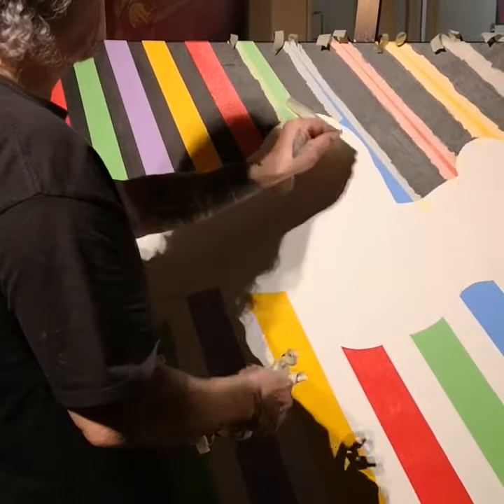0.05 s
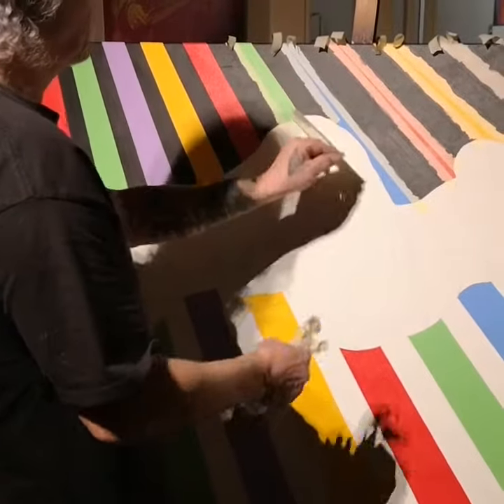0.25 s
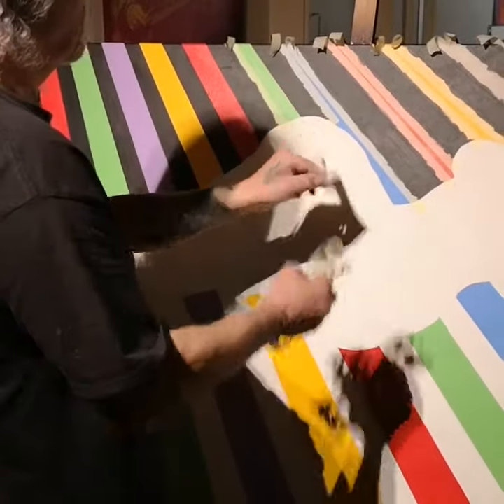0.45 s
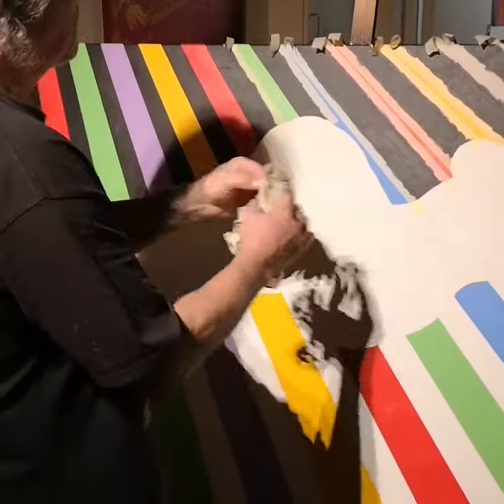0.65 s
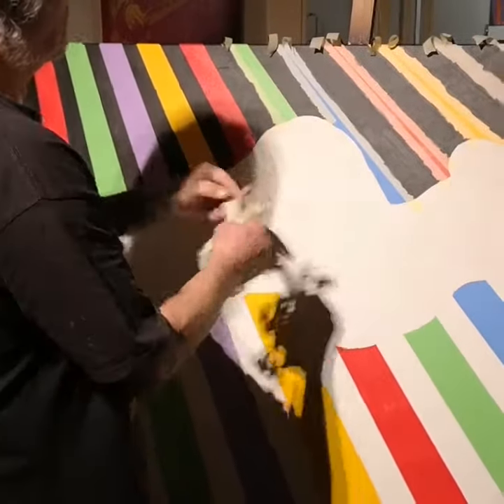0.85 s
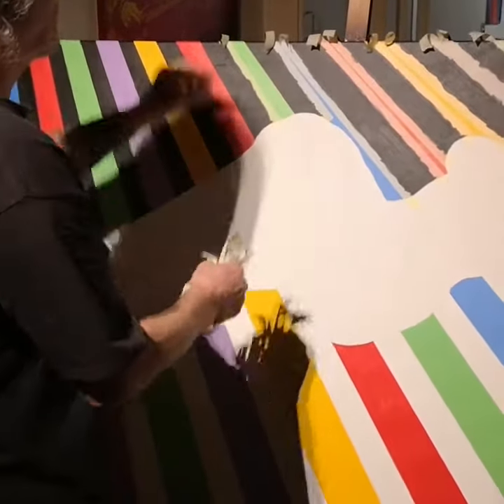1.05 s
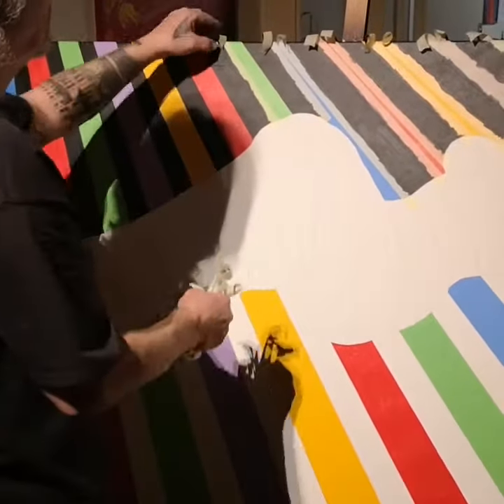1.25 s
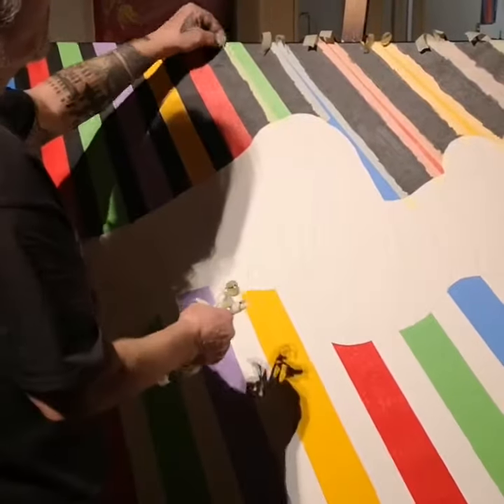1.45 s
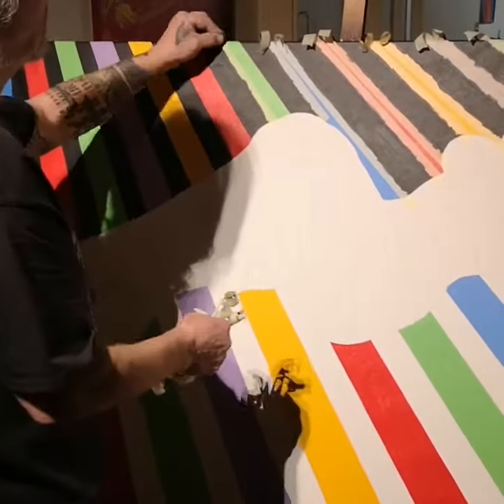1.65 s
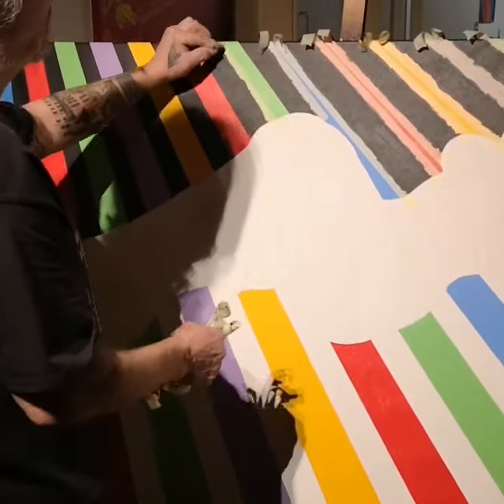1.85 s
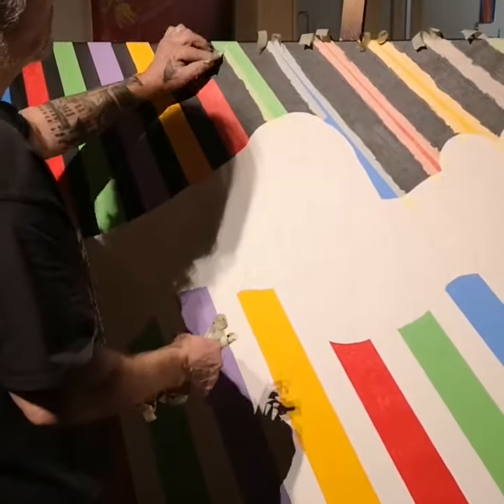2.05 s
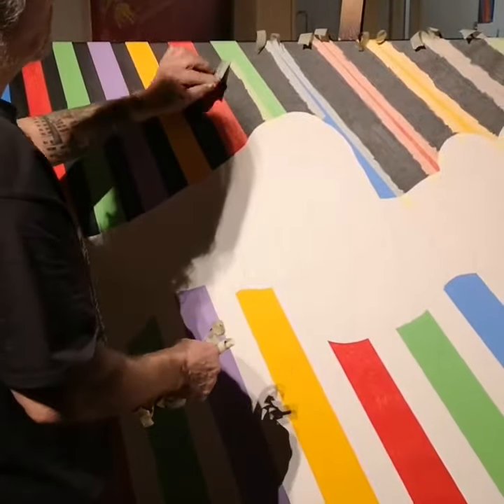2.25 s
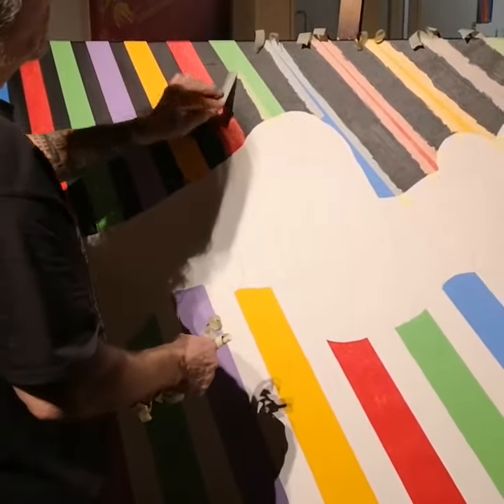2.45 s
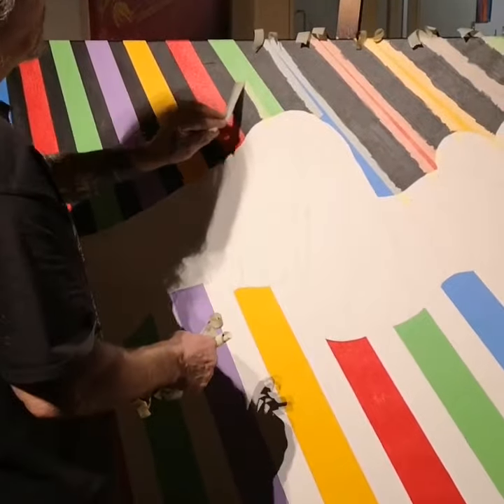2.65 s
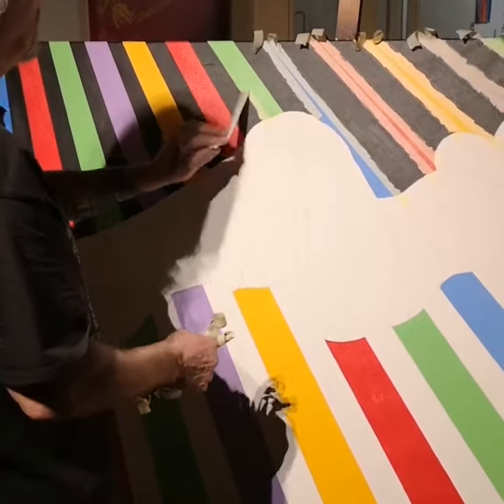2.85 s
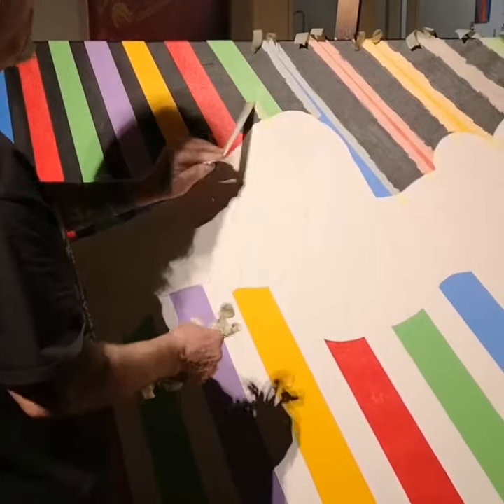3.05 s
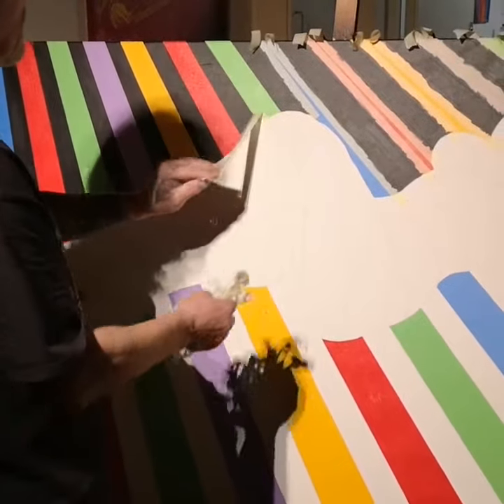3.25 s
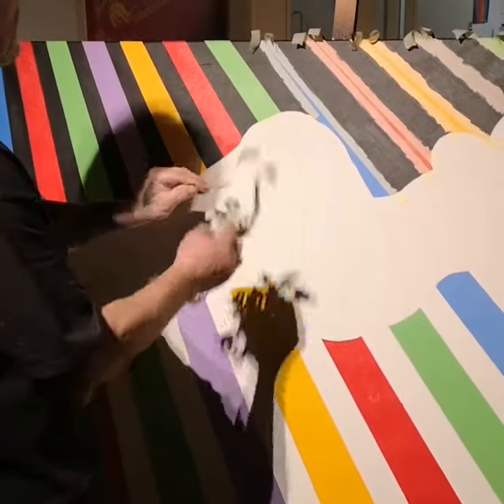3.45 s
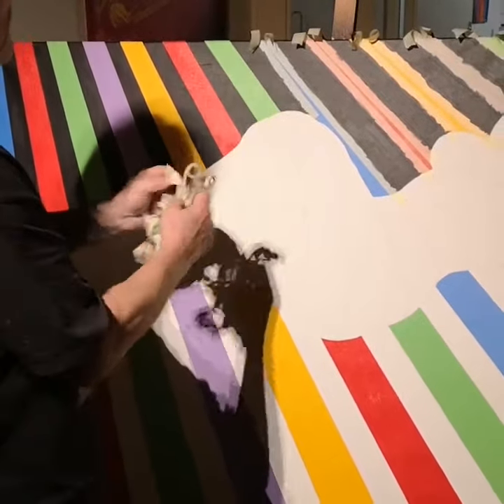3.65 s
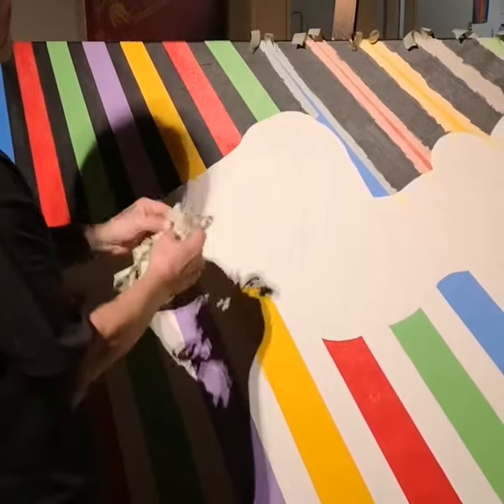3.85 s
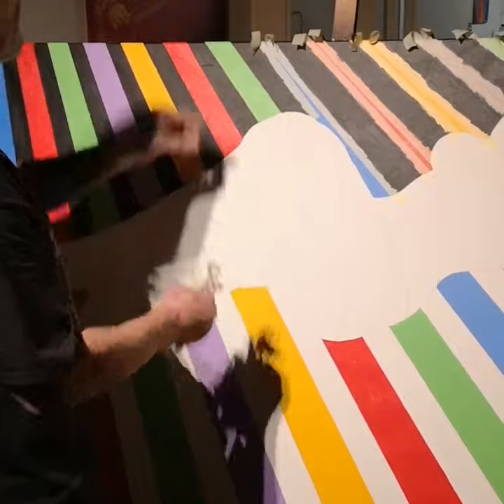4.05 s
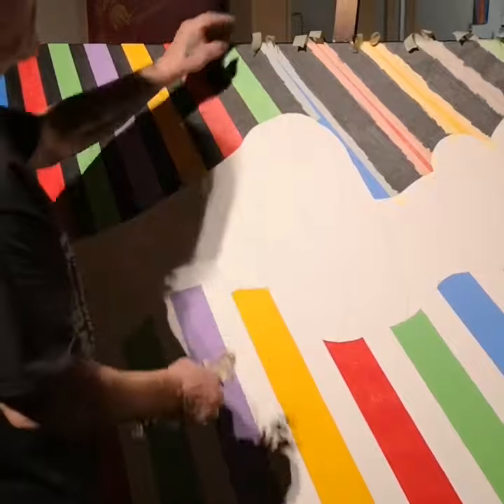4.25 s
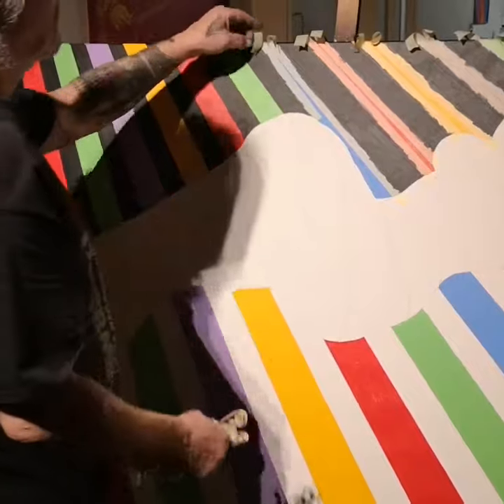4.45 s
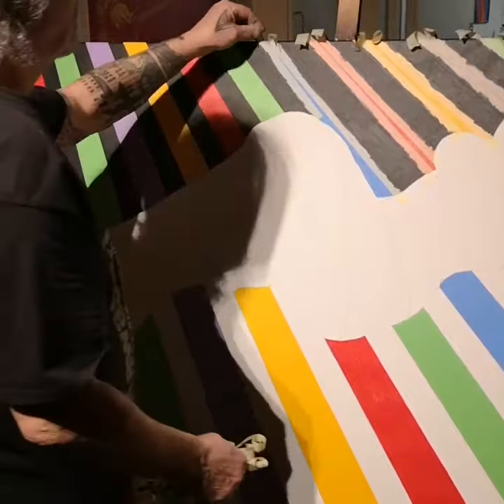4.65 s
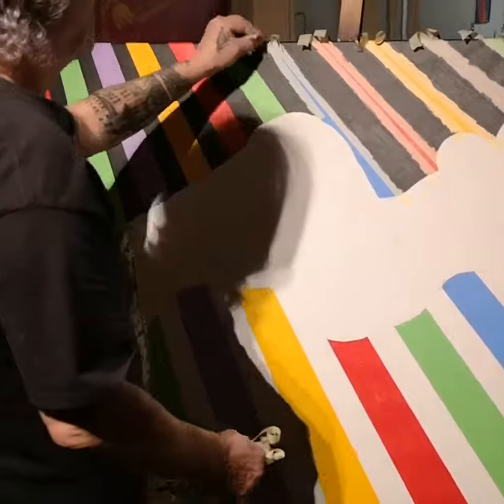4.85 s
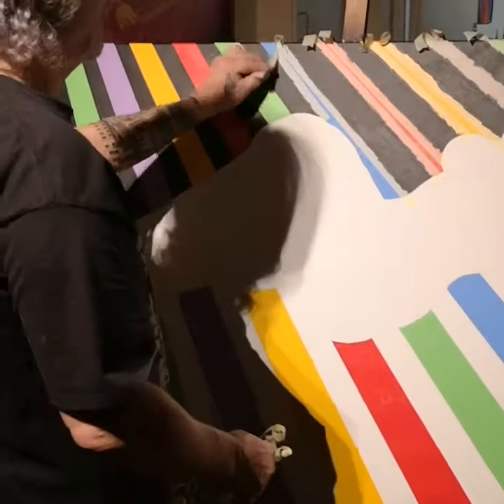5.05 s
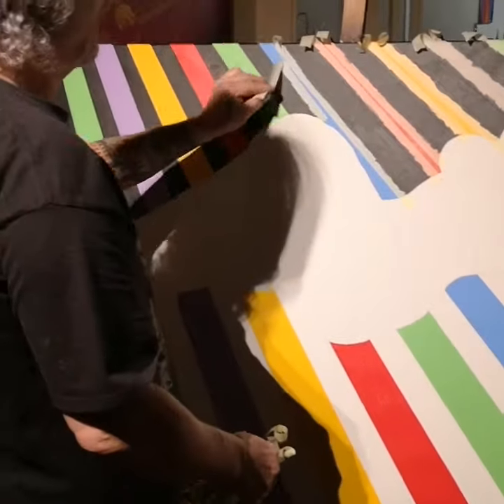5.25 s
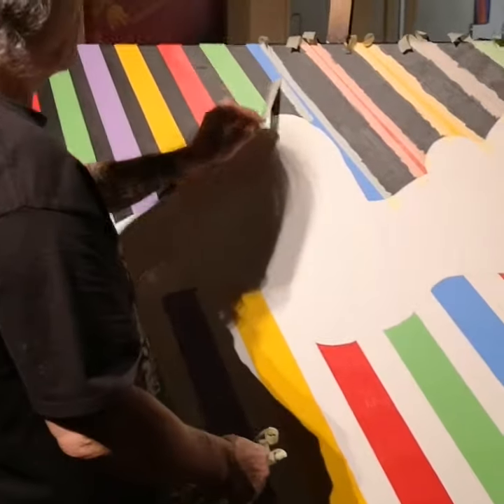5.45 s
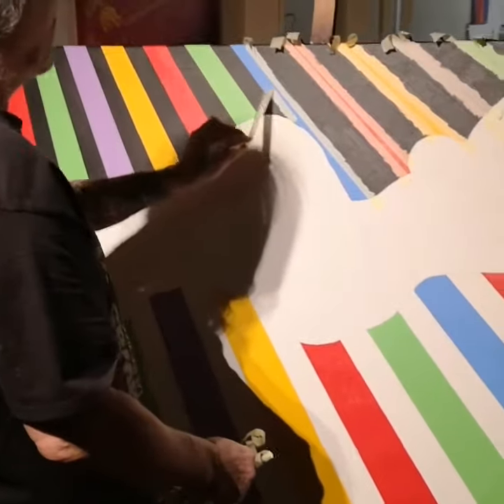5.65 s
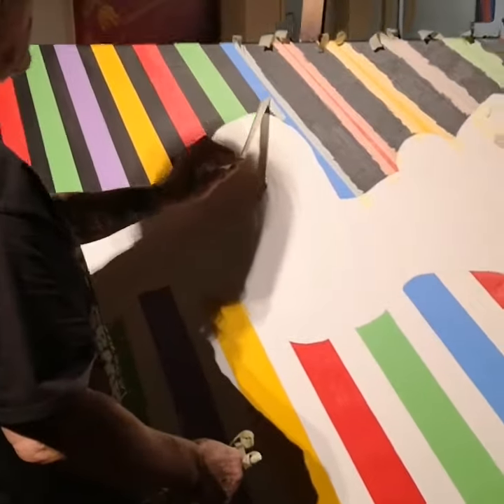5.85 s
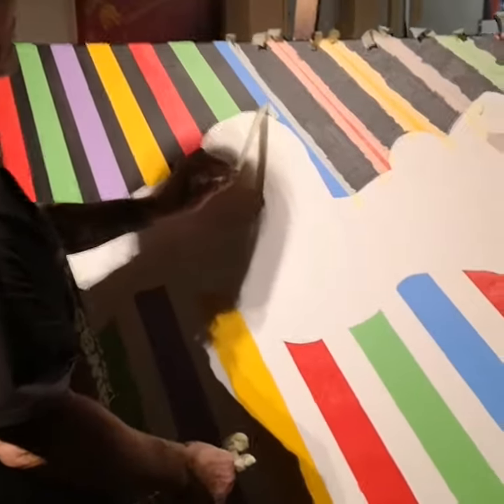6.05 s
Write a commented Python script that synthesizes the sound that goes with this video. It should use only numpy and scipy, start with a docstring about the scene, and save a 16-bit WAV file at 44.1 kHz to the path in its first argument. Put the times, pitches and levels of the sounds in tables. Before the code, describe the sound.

Masking tape is peeled from a drum-like painted canvas, heard very near with short room reflections. Dry, gritty ripping comes in uneven tugs, bright at first, duller and more drumming further along. The first two rips end in an abrupt low boom. Between them sticky paper tape is crumpled and fingers rustle for the next end, with one thin, faint squeak. A third rip begins late and is still going at the end.

```python
"""Three long, crackling rips: masking tape pulled off a stretched, painted canvas in runs of short tugs.
Place: a small studio, heard close up through two ports, over low rumble, faint hiss and a wavering hum.
Tiny slips of the glue crackle, ring the freed strip and the fold of paper, and pluck the canvas like a drum:
thin and bright at the stiff frame, deeper and duller further in. The first two rips end in a boom.
Between pulls the used tape is crumpled into a ball and the next end picked loose, with one faint squeak."""
import sys
import numpy as np
from scipy import signal
from scipy.fft import rfft, irfft
from scipy.io import wavfile
from scipy.ndimage import uniform_filter1d

SR = 44100
rng = np.random.default_rng(int(sys.argv[2]) if len(sys.argv) > 2 else 0)


def put_to_file(sound):
    """Save the sound as 16-bit audio at rate SR, in the file named by the first command-line argument."""
    columns = np.atleast_2d(sound).T  # one column per channel
    safe = np.clip(columns, -1, 1)
    whole_steps = np.round(safe * 32767)
    wavfile.write(sys.argv[1], SR, whole_steps.astype(np.int16))


N = 269010
TIME = np.arange(N) / SR


def amp(db):
    """Decibels to gain."""
    return 10 ** (np.asarray(db) / 20)


def evened(x):
    """Scales to rms 1."""
    return x / np.sqrt(np.mean(x ** 2) + 1e-20)


def read(points, hz):
    """Reads a table on a log-frequency axis."""
    f, value = np.transpose(points)
    return np.interp(np.log(hz + 1), np.log(f + 1), value)


def ring(x, response):
    """Passes x through an impulse response of energy 1."""
    return signal.oaconvolve(x, response / np.linalg.norm(response))[:N]


def colour(x, points, size=4096):
    """Causal (minimum-phase) filter with the shape of the given spectrum."""
    log_gain = np.log(amp(read(points, abs(np.fft.fftfreq(size, 1 / SR)))))
    spectrum = np.exp(np.conj(signal.hilbert(log_gain)))
    return ring(x, np.fft.ifft(spectrum).real[:size // 2])


def resonate(x, hz, width):
    """A resonance of the given width in Hz that follows the curve hz."""
    turn = np.exp(2j * np.pi * np.cumsum(hz) / SR)
    r = np.exp(-np.pi * width / SR)
    # shift the pitch down to zero, smooth there, shift back up
    return 2 * (turn * signal.lfilter([1 - r], [1, -r], x / turn)).real


def clicks(per_s, spread_db, size=N):
    """Random clicks, many small and a few large."""
    sizes = amp(spread_db * np.minimum(rng.exponential(1, size), 4))
    return sizes * (rng.random(size) < per_s / SR)


def signs(size=N):
    """Random polarities."""
    return rng.choice([-1, 1], size)


def steadied(x, size=1500):
    """Keeps the power of a click train near 1: a steady pull frees energy at a steady rate."""
    power = uniform_filter1d(uniform_filter1d(x ** 2, size), size)
    return x / np.sqrt(abs(power) + np.mean(x ** 2) / 20)


def wander(per_s):
    """A slow random curve of rms 1."""
    knots = rng.standard_normal(400)
    return evened(np.interp(TIME * per_s, np.arange(len(knots)), knots))


# likeness of the two microphone ports: pitch_hz, correlation
PORT_LIKENESS = [(150, 0.98), (300, 0.42), (600, 0), (1200, 0.017)]


def pair(z, hz):
    """Makes two unrelated spectra alike in the bass, as at two close microphone ports."""
    same = np.clip(read(PORT_LIKENESS, hz), -1, 1)
    return np.array([z[0], same * z[0] + np.sqrt(1 - same ** 2) * z[1]])


# shape of the room's rumble and hiss: pitch_hz, relative_level_db (per Hz)
ROOM_AIR = [(12, -43), (20, 7.5), (54, -15), (101, -15.5), (245, -24.5), (282, -15), (382, -26.5),
            (534, -34), (1580, -30), (1770, -29), (5530, -39.5), (6910, -39), (8640, -40.5), (10200, -45),
            (15500, -48)]
# hum in the room: pitch_hz, level_db (rms)
ROOM_HUM = [(101, -84), (274, -81.5)]


def background(air_db=-62.5, hum_width=6):
    """Low rumble and faint hiss from shaped noise; a wavering hum from noise through narrow resonances."""
    hz = np.fft.rfftfreq(N, 1 / SR)
    noise = rfft(rng.standard_normal((2, N)))
    air = irfft(pair(noise, hz) * amp(read(ROOM_AIR, hz)), N)
    hum = sum(amp(db) * evened(resonate(rng.standard_normal(N), np.full(N, f), hum_width))
              for f, db in ROOM_HUM)
    return amp(air_db) * evened(air) + hum


# how long the studio rings: pitch_hz, t60_s
STUDIO_DECAY = [(120, 0.41), (300, 0.2), (800, 0.32), (2000, 0.21), (5000, 0.17), (12000, 0.13)]


def echoes(size, early_db=-4.0, tail_db=-7.5, early_t60=0.054):
    """Spectrum of one random pattern of reflections: close surfaces, then the room."""
    t, f = TIME[:size], np.fft.rfftfreq(size, 1 / SR)
    taps = signs((2, size)) * (rng.random((2, size)) < 4000 / SR) * (t > .002)
    hz, when, z = signal.stft(taps, SR, nperseg=256)
    fading = amp(-60 * when / read(STUDIO_DECAY, hz)[:, None])
    tail = signal.istft(z * fading, SR, nperseg=256)[1][:, :size]
    early = rng.standard_normal((2, size)) * (t > .0006) * amp(-60 * t / early_t60)
    mixed = amp(early_db) * evened(early) + amp(tail_db) * evened(tail)
    both = pair(rfft(mixed), f) / np.sqrt(size)
    # close to the canvas its bass is mostly direct
    return both * amp(read([(150, -20.0), (300, -7.0), (600, 1.5)], f))


# lean of the sound from the canvas: pitch_hz, left_over_right_db
LEFT_LEAN = [(250, 0.5), (600, 3), (1200, 1), (2600, 4.5), (5000, 2), (9000, 4), (13000, -5.5)]
PORT_LAG_S = 4.1 / SR


def studio(x, direct_db=-4, size=16384, count=5, moves_per_s=4.0):
    """Direct sound reaches the left port first; the reflections change as the hands travel."""
    f = np.fft.rfftfreq(size, 1 / SR)
    lag = np.exp(-2j * np.pi * f * PORT_LAG_S * np.array([[0], [1]]))
    direct = amp(direct_db + read([(280, -0.16), (450, -0.68)], f)) * lag
    paths = [(x, direct)]
    for k in range(count):
        # the squares of the shares sum to 1
        share = np.sqrt(2 / count) * np.cos(np.pi * (moves_per_s * TIME + k / count))
        paths.append((x * share, echoes(size)))
    lean = amp(read(LEFT_LEAN, f) * np.array([[.5], [-.5]]))
    heard = 0
    for part, path in paths:
        response = np.roll(irfft(path * lean), 20, axis=1)  # room for what the filter spreads ahead of time 0
        heard = heard + signal.oaconvolve(part[None], response, axes=1)[:, 20:N + 20]
    return heard


# faint thin squeak while the fingers work at the next end: start_s, length_s, pitch_hz, relative_level_db
FINGER_SQUEAK = (4.5, 0.8, 1285, -76.5)


def squeak(width_hz=75):
    """A narrow, unsteady tone, resonated out of noise, that swells and fades."""
    s, length, hz, db = FINGER_SQUEAK
    pitch = np.full(N, hz)
    noise = rng.standard_normal(N)
    tone = evened(resonate(resonate(noise, pitch, width_hz), pitch, width_hz))
    return amp(db) * tone * np.sin(np.pi * np.clip((TIME - s) / length, 0, 1))


def crack(length_s, size=600):
    """A run of fibres parting within a millisecond or two, of energy 1."""
    fibres = rng.standard_normal(size) * (rng.random(size) < .3)
    fibres = fibres * np.exp(-TIME[:size] / length_s)
    return fibres / np.linalg.norm(fibres)


# colour of crumpling tape: pitch_hz, relative_level_db (per Hz)
CRUMPLE_COLOUR = [(150, -40), (800, -13.5), (1200, -5.5), (1700, -1.5), (2300, -2), (3100, -1.5),
                  (4100, 1.5), (4900, -5), (6500, -0.5), (8200, 0.5), (10500, -7), (12500, -19.5),
                  (15500, -18)]
# creases of loose tape that buckle at once: start_s, relative_level_db, patch_pitch_hz, ring_over_level_db
SUDDEN_CREASES = [(0.818, -58.5, 8100, -9), (.833, -58.5, 7800, 4), (0.899, -52.5, 2700, -13),
                  (.922, -45.5, 1720, -23), (0.966, -55.5, 2590, 1), (0.984, -47, 2610, -12),
                  (1.041, -49, 1840, -2), (1.23, -59, 8550, -7), (1.704, -58.5, 3060, -3),
                  (1.986, -37.5, 3080, -20), (3.773, -52, 7160, -7), (3.865, -59, 2780, -4),
                  (3.877, -54, 7900, -15), (3.8908, -41, 2020, -27), (4.131, -47, 1870, -11),
                  (4.138, -44, 8600, 0), (4.382, -44, 1740, -12.5)]
CREASE_SWELL_S, CREASE_FADE_S = 0.0023, 0.0031
# rustles as fingers gather tape or feel for the next end: peak_s, relative_level_db, fade_s, patch_pitch_hz
FINGER_RUSTLES = [(.931, -53, 0.023, 1730), (.995, -55, 0.029, 2600), (1.038, -50.5, 0.0083, 2600),
                  (1.674, -63, .018, 8000), (1.712, -63, 0.021, 7840), (1.998, -42.5, 0.011, 2950),
                  (2.035, -47.5, 0.037, 3000), (2.14, -60.5, 0.26, 3100), (3.787, -62.5, 0.03, 7300),
                  (3.925, -55, 0.042, 2400), (4.078, -57.5, 0.041, 2600), (4.133, -47, 0.017, 1740),
                  (4.269, -60.5, 0.012, 7800), (4.32, -63.5, 0.073, 8400), (4.39, -52, 0.016, 3930),
                  (4.895, -57, 0.021, 3300)]
RUSTLE_SWELL = 0.65  # share of the fade time


def crumple(level_db=-2, patch_q=4.4, crack_db=19, crack_s=0.00077, settle_db=-4, rustle_ring_db=-9):
    """Creases crack and settle, rustles swell and fade: clusters of tiny buckles, each ringing a patch of tape."""
    lead = SR // 10
    t = np.arange(-lead, SR // 2) / SR
    clusters = [(s, db, CREASE_SWELL_S, CREASE_FADE_S, hz, ring_db, True)
                for s, db, hz, ring_db in SUDDEN_CREASES]
    clusters += [(s, db, RUSTLE_SWELL * fade, fade, hz, rustle_ring_db, False)
                 for s, db, fade, hz in FINGER_RUSTLES]
    creases, patches = np.zeros((2, N))
    for s, db, swell, fade, hz, ring_db, sudden in clusters:
        buckles = clicks(per_s=520, spread_db=3.8, size=len(t)) * signs(len(t))
        cluster = steadied(buckles, size=600) * np.exp(np.minimum(t / swell, -t / fade))
        if sudden:
            first = amp(crack_db) * crack(crack_s)
            cluster *= amp(settle_db)
            cluster[lead:lead + len(first)] += first
        span = round(s * SR) - lead + np.arange(len(t))
        creases[span] += amp(db) * cluster
        pitch, width = np.full(len(t), hz), hz / patch_q
        patch = evened(resonate(resonate(cluster, pitch, width), pitch, width))
        patches[span] += amp(db + ring_db) * np.std(cluster) * patch
    return amp(level_db) * colour(creases, CRUMPLE_COLOUR) + patches


# strips of tape: start_s (the end lifts at the frame), glue_tack_db
TAPE_STRIPS = [(-1.25, 9.5), (2, 1.77), (5, 0)]


def peel_age():
    """How long the present strip has been peeling, in seconds."""
    starts = np.sort([s for s, tack_db in TAPE_STRIPS])
    latest = np.maximum(np.searchsorted(starts, TIME, side="right") - 1, 0)
    return np.maximum(TIME - starts[latest], 0)


def tack(dulling_db_per_s=7.5):
    """Crackle per unit of force: set by each strip's glue, weaker as the peel moves in from the frame."""
    glue_db = np.zeros(N)
    for s, db in TAPE_STRIPS:
        glue_db[TIME >= s] = db
    return amp(glue_db - dulling_db_per_s * peel_age())


def give(give_s=0.48, steepness=2.7):
    """Drumming per unit of force: the canvas is stiff at the frame and free further in."""
    return 1 - np.exp(-(peel_age() / give_s) ** steepness)


# colour of a pluck at the canvas: pitch_hz, relative_level_db (per Hz)
PLUCK_COLOUR = [(25, -34), (60, 15.5), (100, 11), (150, 8.5), (265, 12.5), (350, -17), (480, -7), (620, -2),
                (950, -4), (1200, -5), (1750, 0), (2300, -5.5), (4000, -8.5), (12000, -31)]
# modes of the stretched canvas: pitch_hz, relative_level_db, t60_s
CANVAS_MODES = [(34.4, 2.5, 0.54), (97.3, -9, 0.81), (131.3, -1.5, 0.2), (184.5, 4.5, 0.21),
                (228, -2, 0.17), (270.3, 5.5, 0.22), (417.6, -5.5, 0.14), (558.5, -12.5, 0.12),
                (640, -36, 0.037), (868, -22, 0.14), (1108, 2.5, 0.04), (1550, -14.5, 0.11)]


def canvas(plucks, skin_db=-2, modes_db=-3.0, shift_db=4.0, shifts_per_s=7):
    """Each pluck dips the pressure, then the canvas drums; the modes it favours change as the peel travels."""
    t = TIME[:SR // 2]
    modes = np.array([amp(db - 60 * t / t60) * np.cos(2 * np.pi * hz * t) for hz, db, t60 in CANVAS_MODES])
    drum = np.zeros(N)
    for mode in modes:
        favour = evened(amp(shift_db * wander(shifts_per_s)))  # a random curve for each mode
        drum += signal.oaconvolve(plucks * favour, mode)[:N]
    skin = colour(plucks, PLUCK_COLOUR)
    return -amp(skin_db) * skin - amp(modes_db) * drum / np.linalg.norm(modes.sum(0))


# colour of the glue's crackle: pitch_hz, relative_level_db (per Hz)
CRACKLE_COLOUR = [(550, -20), (1400, 3.5), (2600, -6), (4100, 2), (4750, -6), (5600, 1), (6500, 1),
                  (7850, 7), (9600, 3), (11000, -5.5), (12500, -14), (15500, -19.5)]


def glue_snaps(snaps, slips, count=8, variety_db=2.5):
    """Every slip frees another bit of crepe paper, coloured by one of a few random tints."""
    kind = rng.integers(0, count, N)[np.cumsum(slips > 0) % N]
    hz = np.linspace(300, 15500, 24)
    tints = read(CRACKLE_COLOUR, hz) + variety_db * rng.standard_normal((count, len(hz)))
    tints -= tints.mean(0) - read(CRACKLE_COLOUR, hz)  # together they average to the table
    return sum(colour(snaps * (kind == k), np.transpose([hz, tints[k]]), size=1024) for k in range(count))


# sudden jerks where the tape gives way: start_s, relative_snap_db, relative_canvas_pluck_db
TAPE_JERKS = [(0.108, -31, -31), (.142, -37.5, -31), (0.168, -28.5, -26), (.204, -29.5, -41),
              (.259, -29.5, -28.5), (0.2954, -32.5, -33), (0.3355, -36, -32.5), (0.397, -35, -29),
              (0.454, -40, -44), (0.5176, -41, -26), (0.5294, -40, -28), (.587, -45, -26.5),
              (2.239, -40, -44), (2.268, -31.5, -33), (2.3623, -36, -27), (2.532, -33, -29),
              (2.6131, -47, -28.5), (2.767, -31.5, -27), (2.8494, -38, -35), (2.9336, -32.5, -31),
              (3.0991, -30.5, -23.5), (3.1574, -39, -26), (3.2328, -48, -33), (3.2544, -32, -28),
              (3.3041, -31, -23.5), (3.3392, -34, -27), (3.4554, -24.5, -25), (3.5718, -31, -30),
              (3.5998, -29, -23), (3.6266, -43, -28), (5.207, -33.5, -33), (5.559, -27.5, -28),
              (5.5674, -26.5, -24), (5.587, -28.5, -23), (5.6013, -25, -27), (5.877, -28.5, -30)]


def jerks(snap_db=13, tear_db=16, thump_db=9, tear_s=0.0016):
    """Single large slips: a snap of the tape, a brief tear of glue and a thump of the canvas."""
    slips, tears, plucks = np.zeros((3, N))
    for s, db, pluck_db in TAPE_JERKS:
        at, tear = round(s * SR), crack(tear_s)
        slips[at], plucks[at] = amp(db), amp(pluck_db)
        tears[at:at + len(tear)] += amp(db) * tear
    snaps = (amp(tear_db) * tears - amp(snap_db) * slips) * tack()
    return amp(thump_db) * canvas(plucks * give()) + glue_snaps(snaps, slips)


def stick_slip(per_s=170, jitter=.4, spread_db=2.5, size=2000):
    """Large slips: tension has to build up again after each, so they come at loosely even gaps."""
    gap, strength = rng.standard_normal((size, 2)).T
    gaps = np.exp(jitter * gap) / per_s
    at = np.round(np.cumsum(gaps) * SR).astype(int)
    sizes = amp(spread_db * strength) * np.sqrt(gaps)  # a longer hold frees more energy
    train = np.zeros(N)
    train[at[at < N]] = sizes[at < N]
    return evened(train)


# the end of the strip tears free in a fast run of slips: start_s, length_s, force_db (relative)
STRIP_RELEASES = [(0.502, 0.051, -40), (3.57, 0.042, -36)]


def releases(boom_hz=225, boom_width_hz=125, skin_db=-4, sway_hz=38, sway_width_hz=18,
             rise_s=0.0026, stop_s=0.015):
    """The last slips come nearly in step with the canvas, which booms, stops short and sways once or twice."""
    run = np.zeros(N)
    for s, length, db in STRIP_RELEASES:
        rise = np.clip((TIME - s) / rise_s, 0, 1)
        stop = np.exp(-(np.maximum(TIME - s - length, 0) / stop_s) ** 2)
        run += amp(db) * rise * stop
    slips = stick_slip(per_s=215, jitter=.26, spread_db=5)
    slips = slips - slips.mean()
    pitch = np.full(N, boom_hz)
    boom = evened(resonate(resonate(slips, pitch, boom_width_hz), pitch, boom_width_hz))
    sway = resonate(run, np.full(N, sway_hz), sway_width_hz)
    return sway - run * boom - amp(skin_db) * colour(run * slips, PLUCK_COLOUR)


def fold(plucks, level_db=1, hz=1700, swing=0.25, width_hz=550, turns_per_s=20):
    """The bend of paper at the peel line rings at a pitch that shifts with the angle of the pull."""
    pitch = hz * np.exp(swing * wander(turns_per_s))
    return amp(level_db) * resonate(resonate(plucks, pitch, width_hz), pitch, width_hz)


# the freed strip while short and taut, one curve per fresh strip: time_s, pitch_hz, level_over_force_db
TAUT_STRIP_RINGS = [
    [(2.18, 3600, 6), (2.235, 2960, 5), (2.27, 2640, 6), (2.32, 2500, -1), (2.37, 3080, -5),
     (2.42, 2940, -7.5), (2.48, 2560, -2), (2.66, 2570, -11), (3.0, 2400, -11.5)],
    [(5.14, 2970, -4), (5.22, 3250, -3), (5.245, 3430, 2), (5.27, 2720, -1.5), (5.305, 2880, -9.5),
     (5.45, 3000, -11), (5.6, 2580, -16), (5.9, 2440, -22)],
]


def strip(bursts, width_hz=1000, long_db=-16, long_hz=2400, paper_hz=2950, paper_width_hz=160, paper_db=-2):
    """The taut strip from fingers to canvas rings at every slip, sliding down and fading as it gets longer."""
    hz, db = np.full(N, float(long_hz)), np.full(N, float(long_db))
    for curve in TAUT_STRIP_RINGS:
        s, ring_hz, ring_db = np.transpose(curve)
        short = (TIME >= s[0]) & (TIME <= s[-1])
        hz[short] = np.interp(TIME[short], s, ring_hz)
        db[short] = np.interp(TIME[short], s, ring_db)
    ticks = steadied(clicks(per_s=2000, spread_db=1.0) * bursts * signs(), size=700)
    rung = resonate(resonate(ticks, hz, width_hz), hz, width_hz)
    paper = resonate(rung, np.full(N, paper_hz), paper_width_hz)  # a sharper mode across the tape's width
    return amp(db) * evened(rung + amp(paper_db) * paper)


# tugs of the hand: start_s, length_s, force_db (relative), force_change_db (over the tug)
HAND_TUGS = [(-0.02, 0.26, -41, -3), (0.197, 0.17, -45.5, -4.5), (0.393, 0.048, -53.5, -4),
             (0.446, 0.061, -52, 6.5), (0.501, 0.044, -41, -3), (2.176, 0.095, -56, 7),
             (2.276, 0.043, -45.5, -0.5), (2.35, 0.029, -44, -1), (2.383, 0.066, -39.5, -3.5),
             (2.483, .05, -59.5, 1), (2.524, 0.087, -45.5, 7), (2.613, 0.14, -40.5, -5),
             (2.767, 0.088, -45, 5.5), (2.869, 0.032, -44, -3), (2.929, 0.059, -46.5, 0),
             (3.015, 0.056, -43.5, -3.5), (3.093, 0.27, -44, 3), (3.386, 0.082, -40.5, -0.5),
             (3.507, 0.098, -45.5, 8.5), (5.157, 0.051, -70.5, 19), (5.204, 0.089, -44.5, 4),
             (5.348, 0.067, -62, 15), (5.417, 0.076, -45, 2.5), (5.504, .24, -37.5, -3),
             (5.75, 0.18, -46, 3), (5.934, 0.13, -49, 3.5), (6.081, 0.056, -39.5, 0)]
TUG_RISE_S, TUG_RELEASE_S = 0.0058, 0.024


def pull():
    """Force of the hand: each tug takes hold quickly, builds or sags, and lets go."""
    force = np.zeros(N)
    for s, length, db, change_db in HAND_TUGS:
        t = TIME - s
        attack = np.clip(t / TUG_RISE_S, 0, 1)
        release = np.exp(-(np.maximum(t - length, 0) / TUG_RELEASE_S) ** 2)
        held = amp(db + change_db * np.clip(t / length, 0, 1))
        force = np.maximum(force, attack * held * release)
    return force


def peel(glue_db=-1, slip_db=-2.5, canvas_db=0.48, small_db=-10, burst_s=0.00073, tension_s=0.047):
    """The tape lets go in large slips with small ones between; each breaks a burst of fine glue threads."""
    force = pull()
    small = evened(clicks(per_s=520, spread_db=0.5))
    slips = steadied(stick_slip() + amp(small_db) * small, size=700)
    bursts = np.sqrt(signal.lfilter([1], [1, -np.exp(-1 / (burst_s * SR))], slips ** 2))
    threads = steadied(clicks(per_s=2200, spread_db=5) * bursts * signs(), size=600)
    snaps = amp(glue_db) * threads - amp(slip_db) * slips
    keep = np.exp(-1 / (tension_s * SR))
    jolts = signal.lfilter([1, -1], [1, -keep], slips - slips.mean())  # steady tension makes no sound
    plucks = jolts * force * give()
    crackle = glue_snaps(snaps * force * tack(), slips)
    return crackle + amp(canvas_db) * (canvas(plucks) + fold(plucks)) + force * strip(bursts)


def scene():
    """Tape and canvas in the studio, over the background of the room."""
    return background() + studio(squeak() + crumple() + jerks() + releases() + peel())


def record(dry, edge_hz=15300):
    """The recorder's band limit: a steep low-pass."""
    low_pass = signal.firwin(511, edge_hz, window=("kaiser", 9), fs=SR)
    return signal.oaconvolve(dry, low_pass[None], "same")


dry = scene()
out = record(dry)
put_to_file(out)
```